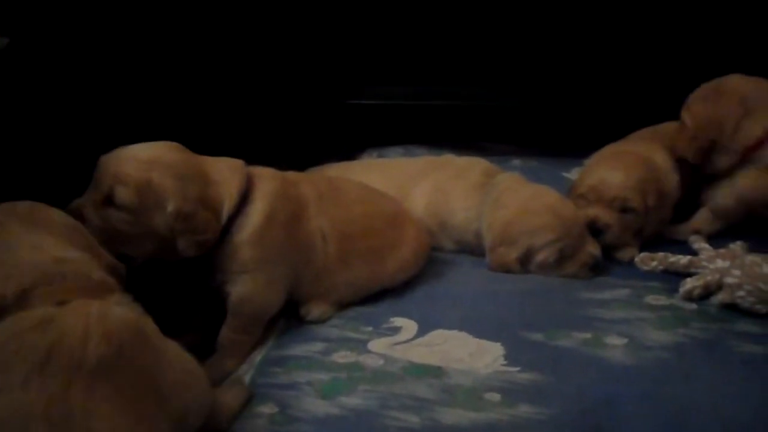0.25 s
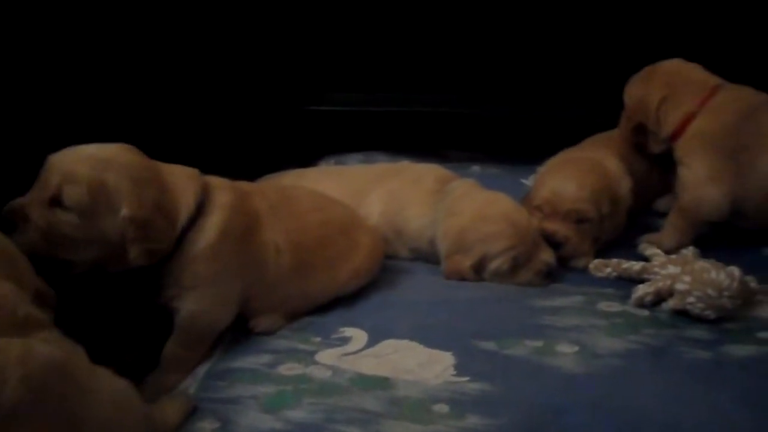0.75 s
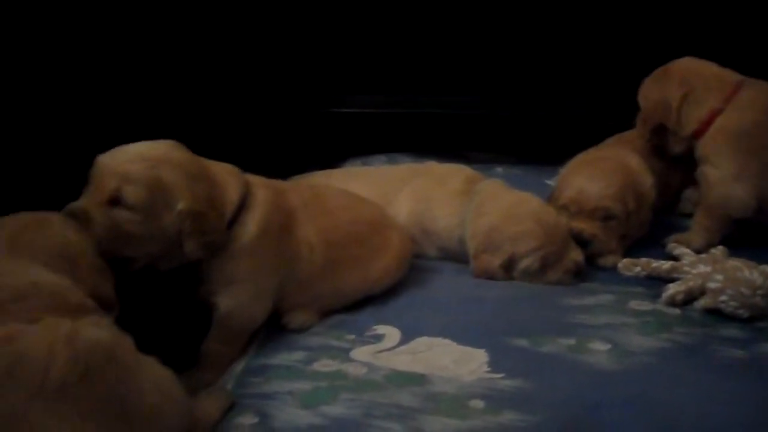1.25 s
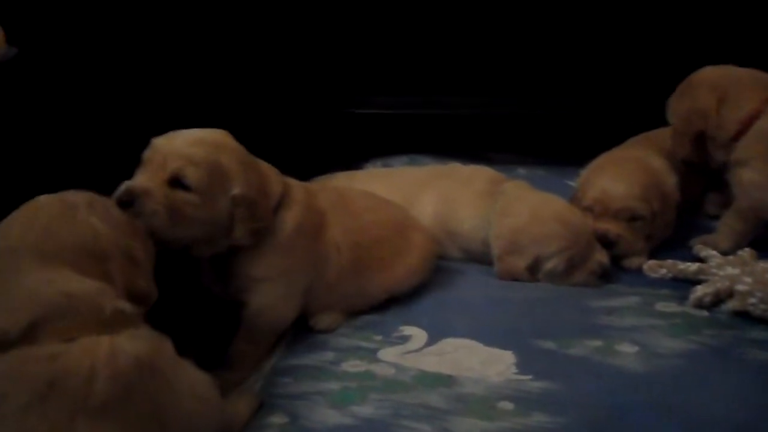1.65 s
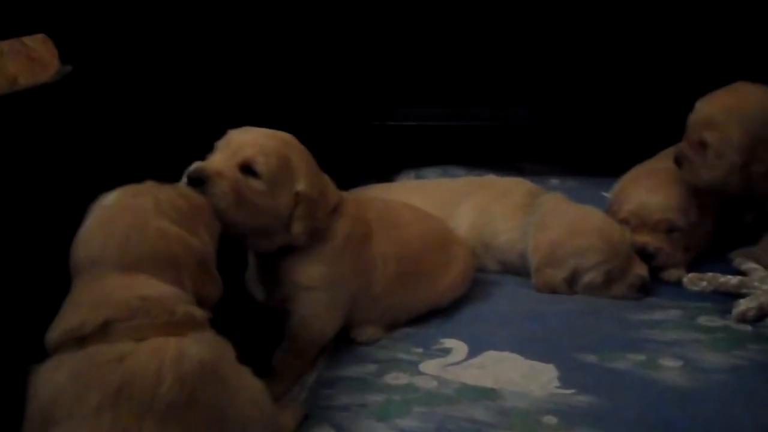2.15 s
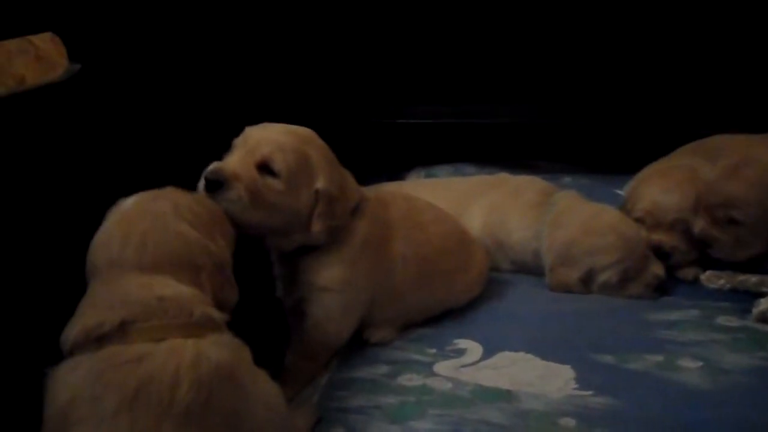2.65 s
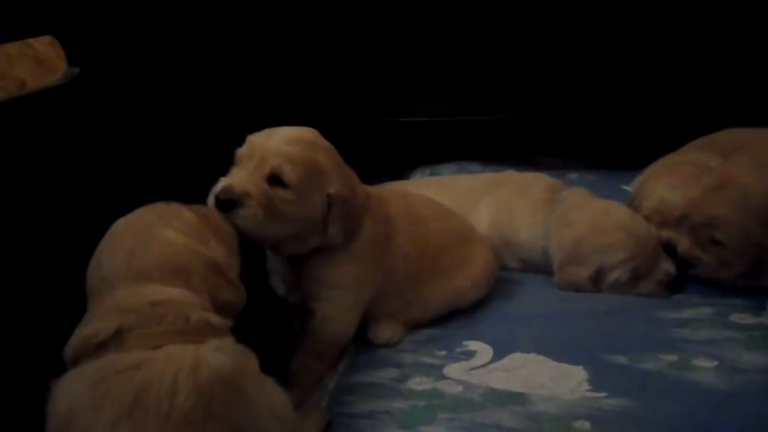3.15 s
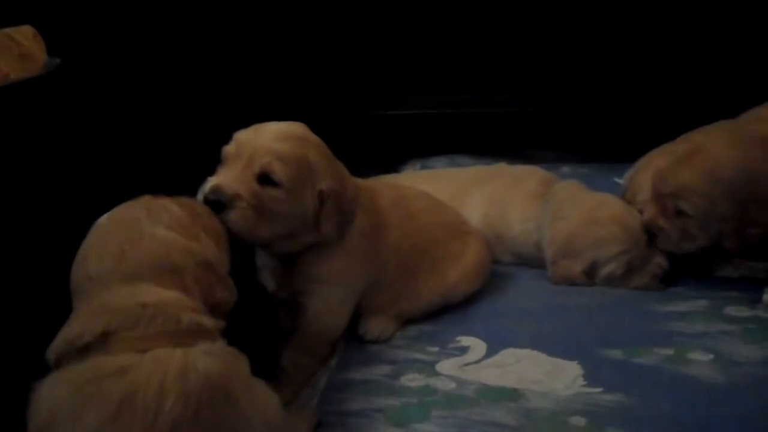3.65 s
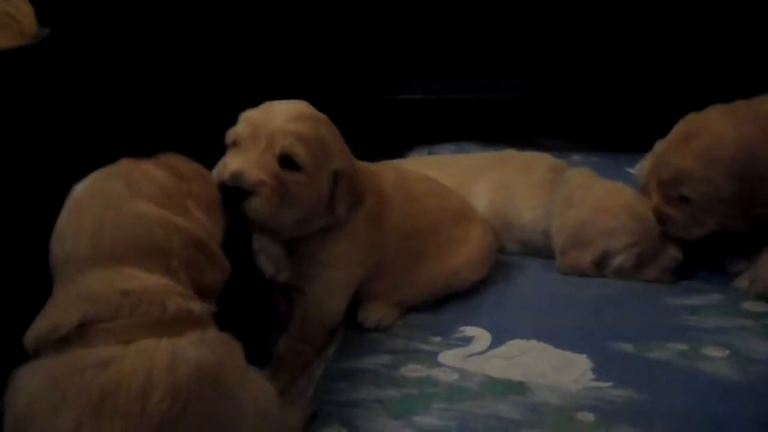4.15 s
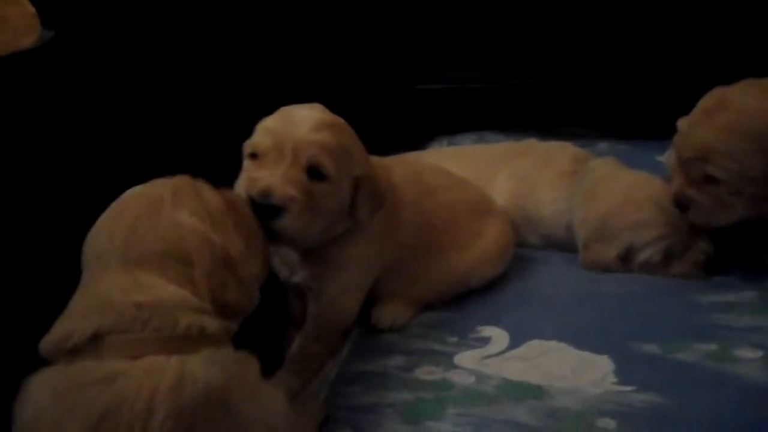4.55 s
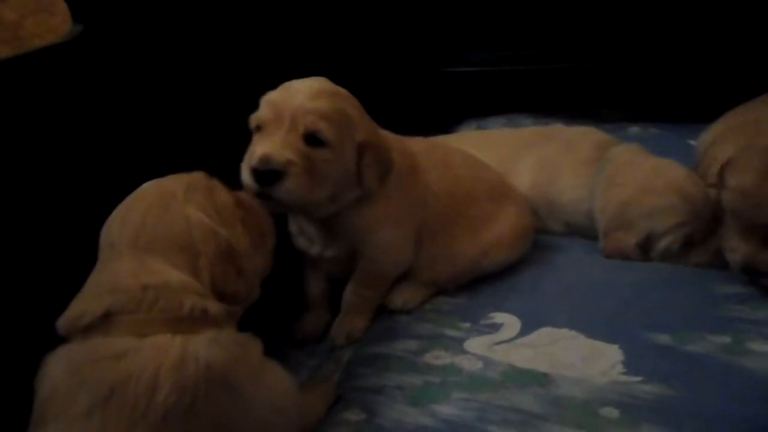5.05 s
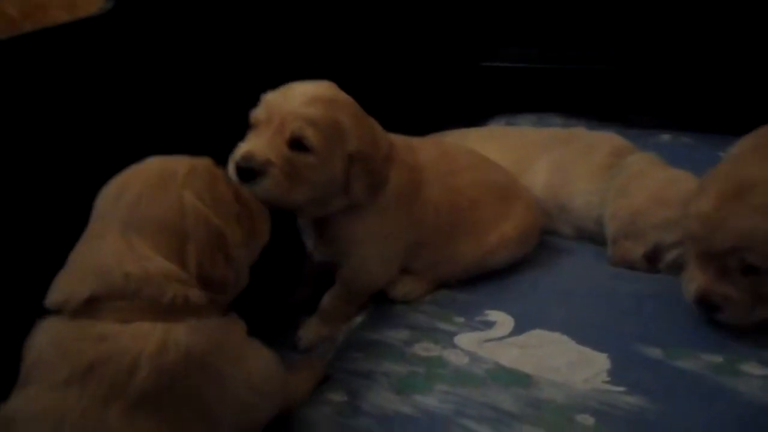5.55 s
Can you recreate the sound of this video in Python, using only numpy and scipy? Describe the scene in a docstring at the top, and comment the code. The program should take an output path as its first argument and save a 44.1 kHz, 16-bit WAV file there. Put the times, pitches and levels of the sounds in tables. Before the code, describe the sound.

Puppies in a quiet but reverberant room, heard through a small camera microphone with steady soft hiss. From the start to about 3.3 seconds the camera's focus motor leaks in as irregular low thumps and short buzzes. Quick high yelps come at 0.4 to 0.55 seconds, a longer bright one at 0.85 to 1.05, and a squeal at 1.35 to 1.5 that sinks into a falling whine until 1.75. Their echoes hang briefly. A small whimper follows at 2.0, then soft, low nasal whimpers until 3.6, among paw rustles at 1.8 to 3.7 and scattered claw ticks. From 3.35 onward dull, rapid regular pulses, often paired, flutter to the end. After a calm gap with one faint scuff, tiny whimpers and a thin high squeal come at 4.6 to 5.05. A yelp drops at 5.25, then a nearer whine rises, cracks and turns hoarse by 5.65, ending with a faint whimper.

```python
"""Puppies in an echoing room

Young puppies yelp with open mouths and whimper through the nose: sums of overtones shaped by a throat.
Paws rustle and claws tick on a mat: shaped noise. The camera's own supply leaks into its microphone:
it sags while the focus motor hunts, then dips on two ten-a-second clocks, often in pairs.
A steady hiss of filtered noise lies under all; the room's echo is noise that decays band by band."""
import sys
import numpy as np
from scipy import signal
from scipy.fft import rfft, irfft, next_fast_len
from scipy.io import wavfile
from scipy.ndimage import map_coordinates

SR = 44100
rng = np.random.default_rng(int(sys.argv[2]) if len(sys.argv) > 2 else 0)


def dump(signal):
    """Clip the signal to [-1, 1] and save it as 16-bit WAV at the path in sys.argv[1]."""
    limited = np.clip(np.atleast_2d(signal).T, -1, 1)
    pcm = np.round(limited * 32767).astype(np.int16)
    wavfile.write(sys.argv[1], SR, pcm)


N = 255339  # samples
TOP_HZ = 15710  # band limit

# Focus motor runs. Each row: start in seconds, length in seconds.
MOTOR_RUNS = [(-0.03, 0.11), (0.14, 0.11), (0.285, 0.0058), (0.312, 0.014), (0.357, 0.0054),
              (0.381, 0.0066), (0.417, 0.0052), (0.448, 0.11), (0.576, 0.0081), (0.637, 0.11),
              (0.766, 0.099), (0.892, 0.1), (1.017, 0.0271), (1.064, 0.1), (1.179, 0.007), (1.213, 0.1),
              (1.331, 0.0063), (1.384, 0.0141), (1.427, 0.0081), (1.484, 0.025), (1.52, 0.0132),
              (1.594, 0.014), (1.614, 0.0052), (1.648, 0.11), (1.757, 0.0086), (1.795, 0.015),
              (1.858, 0.104), (1.979, 0.0081), (2.008, 0.012), (2.075, 0.013), (2.105, 0.0059),
              (2.144, 0.014), (2.186, 0.0061), (2.237, 0.13), (2.38, 0.0131), (2.421, 0.11), (2.552, 0.027),
              (2.593, 0.071), (2.67, 0.014), (2.71, 0.0056), (2.742, 0.11), (2.873, 0.11), (3.004, 0.0054),
              (3.047, 0.1082), (3.177, 0.061), (3.241, 0.03)]
# Clocks of supply dips. Each row: first beat in seconds, mean depth in dB ahead of DIP_GAIN_DB and
# the supply filters, chance of a double dip 0-1.
DIP_CLOCKS = [(3.347, -46, 0.9), (3.381, -43.5, 0.4)]
DIP_PERIOD_S, DIP_SCATTER_S, DIP_SCATTER_DB, DOUBLE_GAP_S = 0.1, 0.00315, 1, 0.0053
MOTOR_STEPS_HZ, DIP_GAIN_DB, DIP_DECAY_S = 93, 1.0, 0.0016
# Hiss spectrum. Each row: frequency in Hz, relative density in dB per Hz.
HISS_SPECTRUM = [(30, -3.5), (100, -17), (300, -20.5), (700, -28.5), (1500, -34.5), (4000, -39.5),
                 (15500, -43.5)]

# Yelps, one list a call. Each row: time in seconds, pitch in Hz, level in dB ahead of VOICE_GAIN_DB,
# mouth opening 0-1, treble level in dB.
YELP_TRACKS = [
    [(0.372, 998, -43.5, 1, 0), (0.39, 1027, -34.5, 0.75, 5), (0.4, 979, -30.5, 1, -2.5),
     (0.408, 915, -26, 0.5, 2.5)],
    [(0.437, 723, -52.5, 0.9, 6), (0.455, 770, -43, 1, 2)],
    [(0.466, 1040, -31.5, 0.6, -6), (0.482, 1110, -43.5, 0.87, 10.5), (0.499, 1025, -39, 0.67, 8.5),
     (0.506, 1015, -33, 0.85, 6), (0.521, 912.6, -32, 1, 6), (0.536, 820, -42, 0.8, 3)],
    [(0.838, 690, -42, 0.24, -7.5), (0.854, 897, -42.5, 0.5, 6.5), (0.87, 889.7, -33.5, 0.68, 13),
     (0.915, 814.5, -30, 0.87, 12.5), (0.923, 800, -36.5, 0.54, 14.5), (0.931, 786, -28, 0.86, 10),
     (0.954, 750, -29, 0.62, 6.5), (0.976, 682, -42, 1, 0.5), (0.985, 654, -26, 1, 1.5)],
    [(1.015, 722, -47, 0.25, 3.5), (1.027, 702, -48, 0.5, 2), (1.05, 605, -37.5, 0.85, -2)],
    [(1.402, 754, -29.5, 0.74, 5), (1.422, 785, -26.5, 0.9, 5.5), (1.43, 788.5, -35.5, 0.8, 8),
     (1.439, 773, -30.5, 0.73, 5), (1.452, 748, -33, 0.85, 0.5), (1.47, 680, -34.5, 0.5, 7.5)],
    [(2.01, 478, -61, 0.9, 0), (2.026, 529.1, -43.5, 0.85, -17), (2.042, 562, -46, 0.8, -14)],
    [(4.71, 1022, -52.5, 0.9, 1), (4.724, 942, -52, 0.88, 15.5), (4.75, 869, -44, 0.56, 14.5),
     (4.767, 726, -44, 0.8, -1)],
    [(5.247, 843, -47, 0.95, 1), (5.295, 878.3, -42, 0.58, 10.5), (5.311, 703, -31.5, 0.82, 10.5),
     (5.327, 643, -33, 0.26, 8), (5.372, 575, -50, 0, -7)],
]
# Voice of each yelp. Each row: first partial at the start in dB, at the end in dB,
# tilt at the start in dB per octave, at the end in dB per octave, roughness 0-1.
YELP_TONES = [(1.5, -6.5, 1, 2, 0.02), (0.5, 10, 2, -3.5, 0.03), (4, -1.5, 6.5, 3, 0.05),
              (3, -3.5, 10.5, 2.5, 0.01), (2, -8, 1.5, 4, 0.1), (-9, -5.5, -0.5, -3, 0.02),
              (0.5, -8.5, -7.5, -8, 0), (9, 6, -1, 4.5, 0.06), (1, 12, 3.5, 4, 0.01)]
# Whimpers. Each row: start in seconds, length in seconds, pitch at the start, turn and end in Hz,
# held level in dB ahead of VOICE_GAIN_DB, mouth opening up to the turn 0-1, first partial up to the turn
# in dB, tilt in dB per octave, roughness from the turn on 0-1.
WHIMPER_ROWS = [(0.989, 0.024, 474, 478, 456, -47, 0.06, -4.5, 6.5, 0.2),
                (2.027, 0.061, 349, 346.9, 310.4, -47, 0.3, -12, -2, 0),
                (2.437, 0.066, 265, 324.3, 290.6, -45.5, 0.17, -7.5, 1.5, 0.05),
                (2.52, 0.05, 314, 304, 294, -61, 0.5, -10, -10, 0.2),
                (2.794, 0.1026, 273, 277, 226.7, -51.5, 0.27, -1.5, -1.5, 0.11),
                (2.886, 0.0522, 270, 246, 206, -53, 0.34, 2.5, 0, 0.07),
                (3.194, 0.034, 248, 230.2, 212.4, -54, 0.23, 6.5, -2, 0.01),
                (3.449, 0.066, 279, 263.6, 253.5, -50.5, 0.32, 2.5, -4.5, 0),
                (3.569, 0.022, 271, 271, 269.2, -63.5, 0.37, 8.5, 1, 0.16),
                (4.612, 0.03, 258.3, 252, 207, -53, 0, 18, 7.5, 0.01),
                (4.806, 0.035, 334, 312.7, 223, -57, 0, -0.5, 2.5, 0.22),
                (4.961, 0.083, 276, 256.7, 252, -53.5, 0.26, 8.5, 1.5, 0.06),
                (5.675, 0.14, 254.7, 260, 280, -55, 0.53, -9, -6, 0.08)]
TURN, HOLD_END = 0.38, 0.87  # shares of the length
START_DB, FADE_DB, WHIMPER_TREBLE_DB = -4, -9.5, -2.5  # first two relative to the held level
# roughness 0-1 at the start; share of the mouth opening left at the end; rise of the first partial
START_ROUGH, MOUTH_LEFT, HUM_DB = 0.16, 0.42, 8.5
# Whines, one list a call; the last starts and ends hoarse. Each row: time in seconds, pitch in Hz,
# level in dB ahead of VOICE_GAIN_DB, mouth opening 0-1, roughness 0-1.
WHINE_TRACKS = [
    [(1.343, 352, -44.5, 0.3, 0.21), (1.357, 400.6, -51, 0.43, 0.13), (1.389, 574, -39, 0.62, 0.01),
     (1.405, 647, -38, 0.8, 0.1)],
    [(1.472, 423, -38.5, 0.6, 0), (1.506, 457.7, -40, 0.6, 0.07), (1.536, 387.2, -39, 0.62, 0),
     (1.595, 379.4, -40, 0.53, 0.02), (1.61, 361, -42, 0.27, 0), (1.644, 323.2, -46.5, 0.34, 0),
     (1.708, 267.8, -44.5, 0.06, 0), (1.737, 267, -49, 0.1, 0.06)],
    [(5.335, 301.6, -42, 0.33, 0.4), (5.371, 292.6, -45.5, 0.31, 0.24), (5.388, 278.3, -43, 0.5, 0.17),
     (5.421, 346.6, -39, 0.65, 0.14), (5.459, 452.4, -39.5, 0.72, 0.08), (5.533, 551, -33, 1, 0),
     (5.561, 493, -35, 0.3, 0.05), (5.57, 440, -39, 0.9, 0.08), (5.58, 399.5, -35.5, 0.3, 0.4),
     (5.6, 332.6, -37.5, 0.3, 0.49), (5.624, 291.4, -42.5, 0.9, 0.54), (5.636, 266, -44, 0, 0.4),
     (5.67, 235, -48, 0.2, 0.34)],
]
# Voice of each whine. Each row: first partial at the start in dB, at the end in dB,
# tilt at the start in dB per octave, at the end in dB per octave, treble at the loudest moment in dB.
WHINE_TONES = [(-9, -11, -0.5, 4, 8), (-16.5, -5.5, 3, -6, -2), (-14, -7.5, -3.5, -2, -3.5)]
TREBLE_PER_DB = 1  # a whine's treble grows with effort: dB lost for each dB under its loudest moment

# Throat with the mouth open: first, second and third puppy. Each row: frequency in Hz, relative gain in dB.
OPEN_FIRST_THROAT = [(250, -10), (500, 3.5), (800, 2.5), (1120, -18.5), (1350, -11.5), (1600, 6),
                     (2100, -4), (2600, -23), (3300, -49), (4200, -20), (5400, -31), (6300, -35),
                     (7800, -45.5), (9500, -70), (15000, -63)]
OPEN_SECOND_THROAT = [(250, 0), (550, 19), (850, 1), (1150, -44.5), (1650, -5), (2300, -35), (3300, -41.5),
                      (3800, -46), (4500, -17), (5300, -31), (6200, -44), (7800, -37), (9500, -56),
                      (15000, -41.5)]
OPEN_THIRD_THROAT = [(250, 13), (550, 10), (800, 0.5), (1100, -24.5), (1650, 0), (2250, -23.5), (2800, -31),
                     (3300, -22.5), (3900, -42), (4400, -31), (5500, -62), (7800, -35), (9500, -57),
                     (15000, -68.5)]
# Throat with the mouth shut, all puppies. Each row: frequency in Hz, relative gain in dB.
SHUT_THROAT = [(250, 4.5), (600, -4), (850, -12.5), (1070, -25.5), (1270, -12), (1600, -24.5),
               (2100, -37.5), (3300, -53), (4700, -43.5), (6200, -43), (7200, -33), (8500, -25.5),
               (10000, -39.5), (15000, -78)]
SECOND_S, THIRD_S = 4, 5.33  # calls starting from here on use the second, third puppy's throat
VOICE_GAIN_DB = 2.0

# Room echo. Each row: frequency in Hz, t60 in seconds, relative level in dB.
ROOM_DECAY = [(292, 0.37, -3.5), (800, 0.39, -1), (1760, 0.43, 3), (2906, 0.49, -2), (5400, 0.32, 1.5),
              (11900, 0.12, -1)]
ECHO_DB, LATER_FEED_DB = -5, -1.5

# Paws dragging on the mat. Each row: start in seconds, length in seconds, peak level in dB.
DRAGS = [(1.818, 0.19, -66.5), (2.223, 0.21, -64), (2.624, 0.173, -66.5), (3.034, 0.24, -76),
         (3.177, 0.19, -73.5), (3.612, 0.12, -71), (4.144, 0.031, -69)]
DRAG_PEAK, DRAG_START_DB, DRAG_END_DB = 0.39, -1.5, -15  # share of the length; levels relative to the peak
# Rustle spectrum. Each row: frequency in Hz, relative density in dB per Hz.
MAT_SPECTRUM = [(240, -39), (400, -3), (683, -2.5), (1260, -9), (1460, -16), (4200, -14.5), (14000, -33)]
# Claw and tongue ticks. Each row: start in seconds, peak in dB, centre in Hz, t60 of the noise puff
# in seconds, width of each of two resonances as a share of the centre.
TICK_ROWS = [(2.2389, -57, 5470, 0.02, 0.49), (2.3112, -61, 2000, 0.013, 0.42),
             (2.3649, -48, 2840, 0.021, 0.54), (2.929, -51.5, 2666, 0.0307, 0.84),
             (3.1184, -57.5, 7940, 0.017, 0.43), (3.5801, -53, 8070, 0.0204, 0.68),
             (5.258, -53, 7530, 0.0144, 0.25)]


def amp(db):
    """Amplitude factor of a level in dB."""
    return 10 ** (np.asarray(db) / 20)


def unit(x):
    """x scaled to an RMS of one."""
    return x / np.sqrt(np.mean(x ** 2) + 1e-20)


def along(points, hz):
    """Interpolate (Hz, value) points on a log-frequency axis."""
    point_hz, values = np.transpose(points)
    return np.interp(np.log(hz + 1), np.log(point_hz + 1), values)


def span(rows, fade_s):
    """First sample, per-sample columns and faded edges of one control table."""
    knots_s, *columns = np.transpose(rows)
    first = max(round(knots_s[0] * SR), 0)
    last = min(round(knots_s[-1] * SR), N)
    t = np.arange(first, last) / SR
    edge = np.clip(np.minimum(t - t[0], t[-1] - t) / fade_s, 0, 1)
    return round(t[0] * SR), [np.interp(t, knots_s, column) for column in columns], edge


def wobble(n, knots_hz):
    """Smooth random curve through Gaussian knots."""
    knots = rng.standard_normal(int(n * knots_hz / SR) + 4)
    return map_coordinates(knots, [np.arange(n) * knots_hz / SR])


def filtered(x, response):
    """x times a complex response of frequency in Hz."""
    m = next_fast_len(len(x) + SR // 2)
    spectrum = rfft(x, m) * response(np.fft.rfftfreq(m, 1 / SR))
    return irfft(spectrum, m)[:len(x)]


def supply():
    """The rail sags and ripples while the motor steps, dips briefly, and couples in through a capacitor."""
    t = np.arange(N) / SR
    running, ripple, dips = np.zeros(N), np.zeros(N), np.zeros(N)
    for start_s, length_s in MOTOR_RUNS:
        on = (t >= start_s) & (t < start_s + length_s)
        running[on] = 1
        # each motor step draws a ramp of current that snaps back
        ripple[on] = 0.5 - (MOTOR_STEPS_HZ * (t[on] - start_s)) % 1
    for first_s, depth_db, chance in DIP_CLOCKS:
        beat_s = np.arange(first_s, (N - 1000) / SR, DIP_PERIOD_S)
        late = rng.standard_normal(len(beat_s))
        size_db = depth_db + DIP_SCATTER_DB * rng.standard_normal((2, len(beat_s)))
        double = rng.random(len(beat_s)) < chance
        # a pair is centred on its beat
        at_s = beat_s + DIP_SCATTER_S * late - DOUBLE_GAP_S / 2 * double
        dips[np.round(at_s * SR).astype(int)] += amp(size_db[0])
        dips[np.round((at_s + DOUBLE_GAP_S) * SR).astype(int)] += double * amp(size_db[1])
    notch = np.exp(-np.abs(np.arange(-400, 401) / SR) / DIP_DECAY_S)
    load = amp(-47.0) * ripple - amp(-40.0) * running
    sag = filtered(load, lambda hz: 1 / (1 + 1j * hz / 260) ** 2)
    rail = sag - amp(DIP_GAIN_DB) * np.convolve(dips, notch, "same")
    drift = amp(-69.5) * wobble(N, 96)
    # 8 Hz high-pass, two 750 Hz low-pass poles
    return filtered(rail + drift, lambda hz: 1j * hz / (8 + 1j * hz) / (1 + 1j * hz / 750) ** 2)


def hiss():
    """Preamplifier noise and the low murmur of the room: steady noise with a falling spectrum."""
    noise = filtered(rng.standard_normal(N), lambda hz: amp(along(HISS_SPECTRUM, hz)))
    return amp(-60.5) * unit(noise)


def drifting(s, start, end):
    """A value that moves evenly from the start of a call to its end."""
    return np.interp(s, s[[0, -1]], [start, end])


def yelp(rows, start_db, end_db, start_tilt_db, end_tilt_db, rough):
    """Control table of one yelp: drifting partial balance, constant roughness."""
    s, hz, db, mouth, treble_db = np.transpose(rows)
    chest_db = drifting(s, start_db, end_db)
    tilt_db = drifting(s, start_tilt_db, end_tilt_db)
    return np.column_stack([s, hz, db, mouth, chest_db, tilt_db, treble_db, rough + 0 * s])


def voice(rows):
    """Fold overtones through the throat; rough folds waver in pitch, smear each line and leak air."""
    start, (hz, db, mouth, chest_db, tilt_db, treble_db, rough), edge = span(rows, fade_s=0.0074)
    n, rough, mouth = len(hz), np.clip(rough, 0, 1), np.clip(mouth, 0, 1)
    hz = hz * (1 + 0.14 * rough * wobble(n, 150))
    # whole k: overtones; half k: the gaps between them
    k = np.arange(2, min(2 * TOP_HZ / hz.min(), 80))[:, None] / 2
    between = k % 1 > 0
    line_hz = k * hz
    if start < SECOND_S * SR:
        open_throat = OPEN_FIRST_THROAT
    elif start < THIRD_S * SR:
        open_throat = OPEN_SECOND_THROAT
    else:
        open_throat = OPEN_THIRD_THROAT
    throat_db = mouth * along(open_throat, line_hz) + (1 - mouth) * along(SHUT_THROAT, line_hz)
    high = np.clip((line_hz - 2800) / 800, 0, 1)
    # the tilt hands over to the treble level across 2800-3600 Hz
    throat_db = throat_db + chest_db * (k == 1) + tilt_db * np.log2(k) * (1 - high) + treble_db * high
    # higher overtones are smeared more, most so through the nose; leaking air fills the gaps
    share = (rough + 0.002) * (1 + (line_hz / 2600) ** 2) + 0.4 * high * (1 - mouth)
    share = np.clip(share, 0, 1)
    gain = amp(throat_db) * (line_hz < TOP_HZ) * np.where(between, 0.92 * share, 1)
    gain = gain / np.sqrt(np.sum(gain ** 2, axis=0) / 2)
    share = np.where(between, 1, share)
    smear = np.array([wobble(n, 296.8) for _ in k])
    phase = 2 * np.pi * (k * np.cumsum(hz) / SR + rng.random(k.shape))
    lines = gain * (np.sqrt(1 - share) + np.sqrt(share) * smear) * np.sin(phase)
    return start, amp(db + VOICE_GAIN_DB) * edge * lines.sum(axis=0)


def puppies():
    """All calls in their places, and their feed to the room; the later puppies lie nearer."""
    calls = np.zeros(N)
    tables = [yelp(rows, *tone) for rows, tone in zip(YELP_TRACKS, YELP_TONES)]
    tables += [whine(rows, *tone) for rows, tone in zip(WHINE_TRACKS, WHINE_TONES)]
    tables += [whimper(*row) for row in WHIMPER_ROWS]
    for rows in tables:
        start, call = voice(rows)
        calls[start:start + len(call)] += call
    # the echo is heard with wider lines than the direct voice: its feed flutters
    flutter = 0.72 + 0.41 * wobble(N, 150)
    nearness = np.where(np.arange(N) < SECOND_S * SR, 1, amp(LATER_FEED_DB))
    return calls, flutter * calls * nearness


def room(x):
    """Echo off the walls: noise in which each frequency dies at its own speed."""
    hz, t, cells = signal.stft(rng.standard_normal(SR * 3 // 4), SR, nperseg=256)
    centre_hz, t60_s, db = np.transpose(ROOM_DECAY)
    t60_s = along(np.transpose([centre_hz, t60_s]), hz)[:, None]
    db = along(np.transpose([centre_hz, db]), hz)[:, None]
    decaying = cells * amp(db - 60 * t / t60_s) / np.sqrt(t60_s)
    tail = signal.istft(decaying, SR, nperseg=256)[1]
    tail = tail / np.sqrt(SR / (6 * np.log(10)))
    return signal.fftconvolve(np.pad(x, (200, 0)), tail)[:N]  # 200 samples late


def whimper(s, length, start_hz, turn_hz, end_hz, db, mouth, chest_db, tilt_db, rough):
    """Control table of one whimper: starts soft, turns, holds its level, fades as the mouth closes."""
    share = np.array([0, TURN, HOLD_END, 1])
    hz = np.interp(share, [0, TURN, 1], [start_hz, turn_hz, end_hz])
    closing = np.interp(share, [TURN, 1], [0, 1])
    level_db = db + np.array([START_DB, 0, 0, FADE_DB])
    opening = mouth * (1 - (1 - MOUTH_LEFT) * closing)
    tilt_and_treble_db = np.ones((len(share), 1)) * [tilt_db, WHIMPER_TREBLE_DB]
    roughness = np.interp(share, [0, TURN], [START_ROUGH, rough])
    return np.column_stack([s + share * length, hz, level_db, opening, chest_db + HUM_DB * closing,
                            tilt_and_treble_db, roughness])


def whine(rows, start_db, end_db, start_tilt_db, end_tilt_db, treble_db):
    """Control table of one whine: drifting partial balance, treble that follows the level."""
    s, hz, db, mouth, rough = np.transpose(rows)
    bright_db = treble_db + TREBLE_PER_DB * (db - db.max())
    chest_db = drifting(s, start_db, end_db)
    tilt_db = drifting(s, start_tilt_db, end_tilt_db)
    return np.column_stack([s, hz, db, mouth, chest_db, tilt_db, bright_db, rough])


def paws():
    """Grainy noise of paws dragging on the mat, and ticks: decaying noise puffs through resonances."""
    out = np.zeros(N)
    grain = amp(3.9 * wobble(N, 120)) * rng.standard_normal(N)
    scrape = unit(filtered(grain, lambda hz: amp(along(MAT_SPECTRUM, hz))))
    for s, length, peak_db in DRAGS:
        rows = [(s, peak_db + DRAG_START_DB),
                (s + DRAG_PEAK * length, peak_db),
                (s + length, peak_db + DRAG_END_DB)]
        start, (db,), edge = span(rows, fade_s=0.02)
        stop = start + len(db)
        out[start:stop] += amp(db) * edge * scrape[start:stop]
    t = np.arange(SR // 50) / SR
    for s, db, hz, t60_s, width in TICK_ROWS:
        puff = amp(-60 * t / t60_s) * rng.standard_normal(len(t))
        ring = filtered(puff, lambda f: (1j * f * hz * width / (hz * hz - f * f + 1j * f * hz * width)) ** 2)
        out[round(s * SR):][:len(t)] += amp(db) * ring / np.abs(ring).max()
    return out


def scene():
    """Direct sounds, their echo, the supply leak and the hiss."""
    calls, sent = puppies()
    mat = paws()
    echo = amp(ECHO_DB) * room(sent + mat)
    return (calls + mat + echo + supply() + hiss())[None]


def record(dry):
    """The camera keeps nothing above its band limit."""
    return filtered(dry[0], lambda hz: hz < TOP_HZ)[None]


dry = scene()
out = record(dry)
dump(out)
```